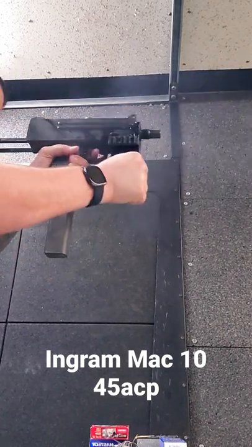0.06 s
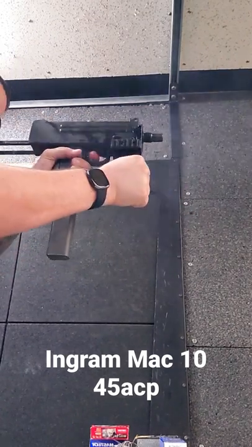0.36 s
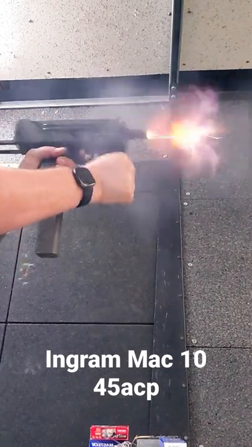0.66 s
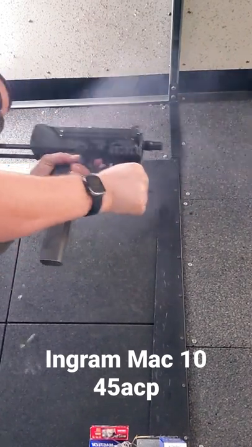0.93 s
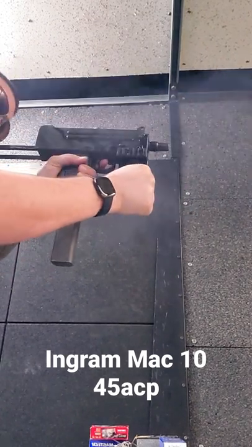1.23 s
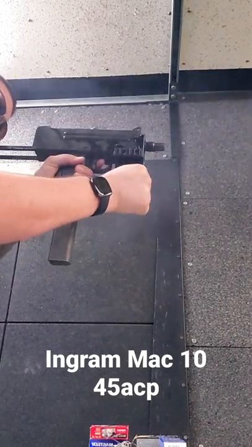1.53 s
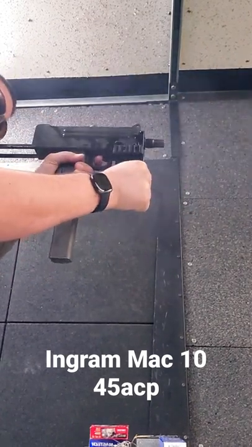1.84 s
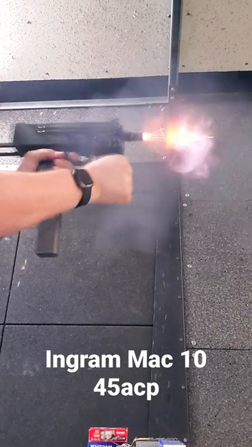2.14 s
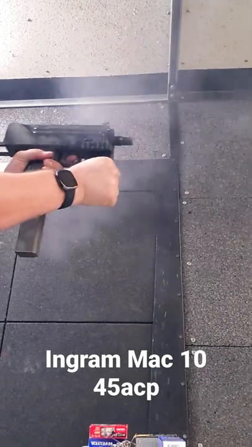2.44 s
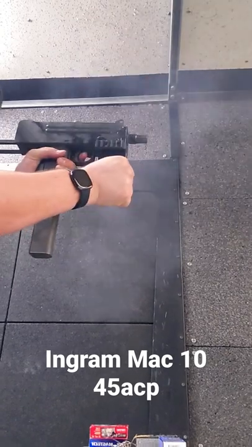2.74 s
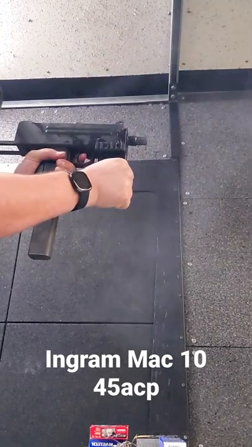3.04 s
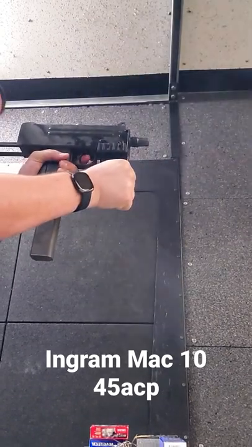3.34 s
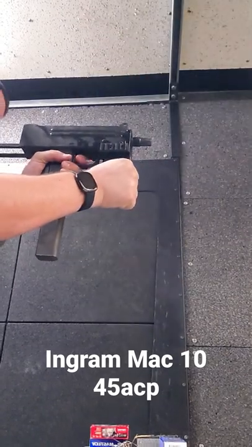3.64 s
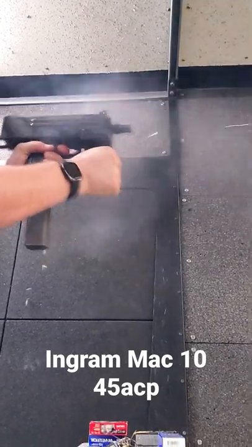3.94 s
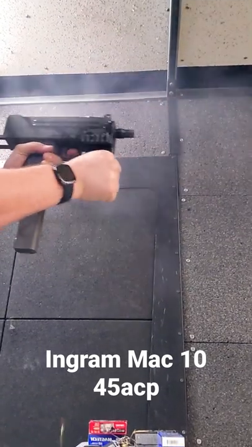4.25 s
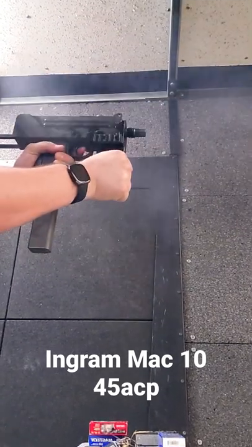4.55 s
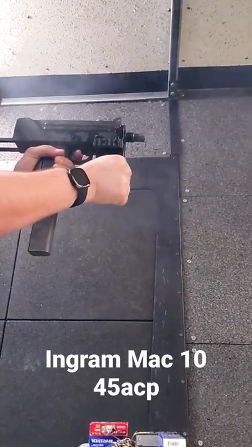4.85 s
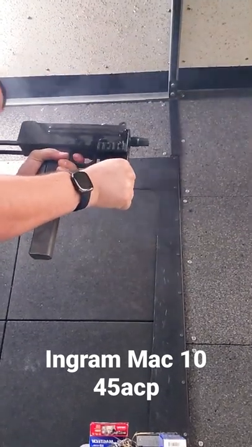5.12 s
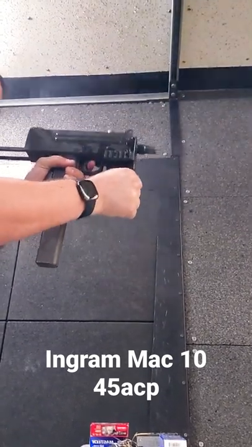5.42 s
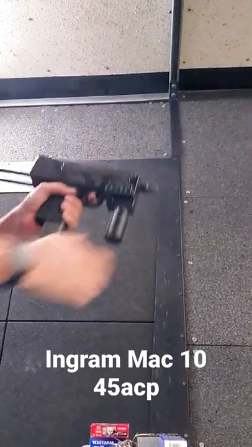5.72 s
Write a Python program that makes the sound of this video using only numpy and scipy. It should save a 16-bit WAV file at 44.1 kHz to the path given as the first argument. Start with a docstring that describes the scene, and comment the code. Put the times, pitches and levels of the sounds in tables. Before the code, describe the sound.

Three rapid bursts of submachine gun fire ring through an indoor shooting range, each followed by a brief echo and clinking spent cases.

```python
"""A submachine gun fires three full-auto bursts from a booth of an indoor range, while an earlier burst
dies away. Each shot rings the booth and the hall, and its bullet slaps the trap at the far end.
The bolt clacks forward before each burst and empty brass cases tinkle and roll on the floor.
The ventilation rumbles throughout, and a sleeve rustles at the end.
The blasts overload the microphone, and its limiter turns everything down for a moment."""
import sys
import numpy as np
from scipy import signal
from scipy.fft import rfft, irfft, next_fast_len
from scipy.io import wavfile

SR = 44100
rng = np.random.default_rng(int(sys.argv[2]) if len(sys.argv) > 2 else 0)


def wav_out(sig):
    """Save sig, one row per channel (or a flat mono array), as 16-bit PCM at SR to the path in sys.argv[1]."""
    wavfile.write(sys.argv[1], SR, np.round(np.clip(np.atleast_2d(sig).T, -1, 1) * 32767).astype(np.int16))


N = 259308
LEAD = SR  # one extra second before time zero holds the earlier burst
TIME = np.arange(-LEAD, N) / SR

# the tones of a ringing brass case; t60 is the time a sound takes to fade by 60 dB
# (frequency [Hz], relative level [dB], t60 [s])
BRASS_TONES = [(7130, -3.5, 0.36), (7300, -12, .26), (11740, -17, .33), (11560, -20.5, .28)]
# the tone colour of struck steel: (frequency [Hz], relative level [dB])
STEEL_COLOUR = [(200, 16), (1000, -2), (3300, 5.5), (5200, -5.5), (6800, 0.5), (9000, -2), (13000, -11),
                (16000, -11.5)]
# the pitches at which a blast makes the booth ring: (frequency [Hz], width [Hz], boost [dB])
BOOTH_RESONANCES = [(148, 42, 5), (195, 24, 3), (231, 15, 8.5), (286.8, 55, 10.5), (341, 9.9, 10),
                    (445.6, 63, 8.5), (630, 130, 6.5), (912, 10, 7)]
# the bursts of fire, with relative levels; the sear is the catch that holds the bolt back
# (first shot [s], last shot [s], rounds [count], first blast [dB], bolt travel [s], sear click [dB],
#  chambering clack [dB])
BURSTS = [(-.38, -.28, 3, 9, .04, -25, -15), (0.4845, .714, 6, 6.5, 0.038, -24.5, -22),
          (1.997, 2.346, 8, 8, .061, -33, -15), (3.7314, 4.122, 9, 7, 0.043, -24.5, -12.5)]


def from_db(db):
    """Turn decibels into a factor to multiply by."""
    return 10 ** (np.asarray(db) / 20)


def at_hz(points, hz):
    """Read between the rows of a (frequency, value) table, giving each octave equal room."""
    table_hz, values = np.transpose(points)
    return np.interp(np.log(np.maximum(hz, 1)), np.log(table_hz), values)


def fade(t, t60):
    """Start at t = 0 and die away by 60 dB every t60 seconds."""
    return (t >= 0) * np.exp(-np.log(1000) * np.maximum(t, 0) / t60)


def add(track, time_s, sound):
    """Mix a stereo sound into the track at the given time."""
    start = LEAD + round(time_s * SR)
    part = sound[:, :max(track.shape[1] - start, 0)]
    track[:, start:start + part.shape[1]] += part


def low_cut(x, hz):
    """Gently remove the sound below a frequency."""
    return signal.sosfilt(signal.butter(2, hz, "high", fs=SR, output="sos"), x)


def noise(colour, size, resonances=()):
    """Stereo noise of strength 1 with a given tone colour and, if wanted, some boosted pitches."""
    # how much the microphone's two openings differ: (frequency [Hz], side minus mid [dB])
    stereo_width = [(60, -27), (380, -25.5), (700, -6), (1200, 2), (2400, 0.5), (16000, 0)]
    hz = np.fft.rfftfreq(size, 1 / SR)
    boost_db = sum(db / (1 + (2 * (hz - centre) / width) ** 2) for centre, width, db in resonances)
    # mid is what left and right share, side is where they differ
    mid, side = np.exp(2j * np.pi * rng.random((2, len(hz))))
    spread = from_db(at_hz(stereo_width, hz))
    left_right = (mid + spread * side * [[1], [-1]]) / np.hypot(1, spread)
    x = irfft(left_right * from_db(at_hz(colour, hz) + boost_db), size)
    return x / x.std()


def hit(colour, t60, room_db, room_t60):
    """A short impact and the longer wash it leaves in the room."""
    t = np.arange(SR // 2) / SR
    return noise(colour, len(t)) * np.hypot(fade(t, t60), from_db(room_db) * fade(t, room_t60))


def ventilation(level_db=-52.5):
    """Air rumbles steadily through humming ducts."""
    # the tone colour of the moving air: (frequency [Hz], relative level [dB])
    air_colour = [(20, -14.5), (45, -0.5), (130, -1.5), (220, -13), (400, -9.5), (800, -20), (1600, -16.5),
                  (4400, -22.5), (6000, -29), (9000, -42), (16000, -42)]
    # the hum of the ducts: (frequency [Hz], width [Hz], boost [dB])
    duct_hum = [(72, 12, 4), (142.8, 22, 10)]
    return from_db(level_db) * noise(air_colour, next_fast_len(len(TIME)), duct_hum)[:, :len(TIME)]


def sleeve(peak_s=5.88, peak_db=-44.5, rise_db_per_s=45):
    """A sleeve's soft rustle grows as the gun is lowered."""
    # the tone colour of rubbing cloth: (frequency [Hz], relative level [dB])
    cloth_colour = [(40, -7), (110, 7.5), (450, -2.5), (800, -12), (1600, -4), (2400, -8), (4500, -11),
                    (8000, -31.5), (16000, -26)]
    swell = from_db(peak_db - rise_db_per_s * np.abs(TIME - peak_s))
    return swell * noise(cloth_colour, next_fast_len(len(TIME)))[:, :len(TIME)]


def rolling_cases(level_db=-3, tone_width_hz=25, half_strength_s=.07):
    """Scraping over the floor keeps a rolling case singing; each roll swells and fades."""
    # cases rolling past: (loudest moment [s], relative level [dB])
    rolls = [(1.5, -53), (1.89, -56), (3.39, -56.5), (4.75, -52.5), (5.32, -52.5), (5.68, -55.5),
             (5.86, -46.5)]
    scrape = rng.standard_normal((2, len(TIME)))
    song = sum(from_db(db) * signal.lfilter(*signal.iirpeak(hz, hz / tone_width_hz, fs=SR), scrape)
               for hz, db, _ in BRASS_TONES)
    swells = sum(from_db(db) / (1 + ((TIME - time_s) / half_strength_s) ** 2) for time_s, db in rolls)
    return from_db(level_db) * swells * song / song.std()


def landings(hop_s=.055, contact_loss_db=12, ring_loss_db=7, strays_per_s=4, stray_spread_db=3.5):
    """Near cases land and hop once, more softly; stray ones land at random further off."""
    # the nearest cases landing, with relative levels: (time [s], tick [dB], clink [dB], ring [dB])
    near_cases = [(.211, -39.5, -60, -39), (.3013, -46, -48, -44.5), (.356, -34.5, -49, -63),
                  (1.1573, -37.5, -41, -49), (1.364, -41, -47, -41), (1.4772, -42, -47, -39.5),
                  (1.719, -29.5, -43, -55), (1.821, -46, -49, -42.5), (2.7167, -41, -33.5, -40),
                  (2.846, -36, -39, -48), (2.8881, -34, -38, -45), (2.935, -38, -51, -57),
                  (3.079, -38, -39, -64), (3.165, -42.5, -55, -64), (3.31, -58, -44.5, -51),
                  (3.3426, -46, -60, -44), (3.5388, -47, -45.5, -50), (4.4714, -34.5, -43, -60),
                  (4.5736, -36.5, -38.5, -52), (4.7312, -36, -44, -48), (4.8458, -39, -62, -46),
                  (4.9798, -42.5, -47.5, -54), (5.105, -42, -46.5, -61), (5.225, -48, -54, -47),
                  (5.322, -36.5, -46, -50), (5.39, -47, -52, -52), (5.5503, -44, -54, -58),
                  (5.638, -49, -45, -44)]
    rows = list(near_cases)
    for time_s, tick_db, clink_db, ring_db in near_cases:
        hop_time_s = time_s + hop_s * rng.uniform(.5, 1.5)
        rows.append((hop_time_s, tick_db - contact_loss_db, clink_db - contact_loss_db,
                     ring_db - ring_loss_db))
    stray_db = np.array([-51, -57.5, -53.5])  # tick, clink, ring
    for slot_s in np.arange(0, N / SR, 1 / strays_per_s):
        time_s = slot_s + rng.random() / strays_per_s
        rows.append((time_s, *(stray_db + stray_spread_db * rng.standard_normal(3))))
    return rows


def floor_contact(t, bounce_s=.0083, bounce_db=-5, room_db=-12):
    """How a landing's loudness moves: one end of the case touches, then the other; the room answers."""
    first_end = fade(t, t60=.05) * (1 - np.exp(-t / .001))
    second_end = from_db(bounce_db) * fade(t - bounce_s * rng.uniform(.49, 2.2), t60=.064)
    room = from_db(room_db) * fade(t, t60=.21)
    return np.hypot(np.hypot(first_end, second_end), room)


def brass_ring(t, detune=.0049, flutter_hz=45, flutter_depth=.47, spread_db=1):
    """One case rings; its spin and the room's echoes make each of its tones flutter."""
    out = 0
    pitch = 1 + detune * rng.standard_normal()
    steps = np.arange(200)
    for hz, db, t60 in BRASS_TONES:
        strength = from_db(db + spread_db * rng.standard_normal((2, 1)))
        # complex random numbers shake both the loudness and the phase of the tone
        jolts = rng.standard_normal((2, len(steps))) + 1j * rng.standard_normal((2, len(steps)))
        wobble = np.array([np.interp(2 * flutter_hz * t, steps, channel) for channel in jolts])
        flutter = (1 + flutter_depth * wobble) / np.hypot(1, flutter_depth)
        tone = np.exp(2j * np.pi * (hz * pitch * t + rng.random((2, 1))))
        out = out + strength * fade(t, t60) * np.real(flutter * tone)
    return out


def falling_cases(tick_gain_db=-4):
    """Each case ticks, clinks and rings as it lands; there are also dull knocks against the booth."""
    # the tone colour of the sharp tick on the floor: (frequency [Hz], relative level [dB])
    tick_colour = [(300, -13), (1500, -10.5), (3000, -4), (6000, -3), (7100, 4), (9500, -4), (13000, -5),
                   (16000, -13.5)]
    # the tone colour of the metallic clink: (frequency [Hz], relative level [dB])
    clink_colour = [(500, -28.5), (2000, -27), (3100, -8), (3700, -7), (4300, -0.5), (4900, -11.5),
                    (16000, -38)]
    # cases striking the booth: (time [s], level [dB])
    booth_knocks = [(.307, -35.5), (.351, -37), (1.7192, -41.5), (2.748, -31.5), (2.932, -34), (3.397, -49),
                    (4.7338, -40.5), (5.242, -44), (5.322, -48)]
    # the tone colour of those knocks: (frequency [Hz], relative level [dB])
    knock_colour = [(100, -49), (400, -3), (650, -5), (950, -7), (1400, -9.5), (3000, -6.5), (6000, -14),
                    (16000, -30)]
    out = np.zeros((2, len(TIME)))
    t = np.arange(SR // 3) / SR
    for time_s, tick_db, clink_db, ring_db in landings():
        tick = from_db(tick_db + tick_gain_db) * noise(tick_colour, len(t))
        clink = from_db(clink_db) * noise(clink_colour, len(t))
        add(out, time_s, (tick + clink) * floor_contact(t) + from_db(ring_db) * brass_ring(t))
    for time_s, db in booth_knocks:
        add(out, time_s, from_db(db) * hit(knock_colour, t60=.15, room_db=-34, room_t60=.4))
    return out


def bolt(gain_db=2, pickup_after_s=.022, pickup_boost_db=7, chamber_before_s=.016):
    """Three steel clacks before a burst: the sear lets go, the bolt picks up a round and rams it home."""
    out = np.zeros((2, len(TIME)))
    for first_s, *_, travel_s, sear_db, chamber_db in BURSTS:
        release_s = first_s - travel_s
        clacks = [(release_s, sear_db, 2700),
                  (release_s + pickup_after_s, sear_db + pickup_boost_db, 1800),
                  (first_s - chamber_before_s, chamber_db, 1800)]
        for time_s, db, low_cut_hz in clacks:
            clack = hit(STEEL_COLOUR, t60=.076, room_db=-17, room_t60=.3)
            add(out, time_s, from_db(db + gain_db) * low_cut(clack, low_cut_hz))
    return out


def hall_echo(build_s=.09, far_wall_s=.247, swell_width_s=.034, swell_db=3):
    """The hall fills with sound, swells once as the far wall answers, and dies away treble first."""
    # the tone colour of the hall's echo: (frequency [Hz], relative level [dB])
    hall_colour = [(30, -33), (70, -2), (120, -9.5), (250, -4.5), (430, 2), (600, -10.5), (900, -9),
                   (1600, 0.5), (3000, -2.5), (5000, -10), (8000, -19), (16000, -66.5)]
    # how long the hall rings: (frequency [Hz], t60 [s])
    fade_times = [(60, 1.77), (150, 1.046), (400, 0.93), (800, 0.94), (2000, 0.84), (4000, 0.71),
                  (8000, 0.55), (16000, .3)]
    t = np.arange(2 * SR) / SR
    spectrum = rfft(noise(hall_colour, len(t), BOOTH_RESONANCES))
    hz = np.fft.rfftfreq(len(t), 1 / SR)
    centres, t60s = np.transpose(fade_times)
    out = 0
    for share, t60 in zip(np.eye(len(centres)), t60s):  # each band fades at its own speed
        band = irfft(spectrum * at_hz(np.c_[centres, share], hz), len(t))
        out = out + band * fade(t, t60)
    far_wall = 1 + from_db(swell_db) * np.exp(-((t - far_wall_s) / swell_width_s) ** 2)
    return out * (1 - np.exp(-t / build_s)) * far_wall


def booth_echo():
    """A blast bounces around the shooter so quickly that its echoes blur together."""
    # the tone colour of a blast in the booth: (frequency [Hz], relative level [dB])
    booth_colour = [(30, -47.5), (70, -23), (120, -2.5), (190, -2.5), (400, -10), (550, -4), (1100, -5.5),
                    (2500, -2), (4000, -10), (7000, -18.5), (10000, -26.5), (16000, -27)]
    t = np.arange(SR // 4) / SR
    return noise(booth_colour, len(t), BOOTH_RESONANCES) * fade(t, t60=.23)


def wall_slaps(phases, width_cycles=1.66, gain_db=-7.5, spread_db=3):
    """Large surfaces throw back short, low slaps, stronger or weaker as the muzzle jumps."""
    # echoes off the partitions, ceiling and back wall: (delay [s], pitch [Hz], relative level [dB])
    surfaces = [(0.0145, 672, 4.5), (0.0194, 400, 5.5), (0.025, 200.9, -3), (.031, 668, -3),
                (.041, 413, 0.5), (.046, 269, -4), (.058, 215, -6.5), (.066, 365, -4.5), (.088, 407, -4.5)]
    out = 0
    t = np.arange(SR // 8) / SR
    for (delay_s, hz, db), phase in zip(surfaces, phases):
        cycles = (t - delay_s) * hz
        strength = from_db(db + gain_db + spread_db * rng.standard_normal((2, 1)))
        out = out + strength * np.exp(-(cycles / width_cycles) ** 2) * np.sin(2 * np.pi * (cycles + phase))
    return out


def shots(sag_db=8.5, spread_db=1.55, jitter_s=.0012):
    """The gun fires almost evenly, weakening through a burst: rows of (time [s], relative level [dB])."""
    rows = []
    for first_s, last_s, rounds, first_db, *_ in BURSTS:
        for progress in np.linspace(0, 1, round(rounds)):
            later, louder = rng.standard_normal(2) * (progress > 0)  # the first shot does not vary
            time_s = first_s + progress * (last_s - first_s) + jitter_s * later
            rows.append((time_s, first_db - sag_db * progress + spread_db * louder))
    return rows


def gunfire(booth_db=7, hall_db=-12, crack_db=4, trap_db=-30, trap_delay_s=.186):
    """Each shot's hot gas cracks and rings the same room; then its bullet hits the steel trap."""
    # the tone colour of the gas leaving the muzzle: (frequency [Hz], relative level [dB])
    crack_colour = [(100, -16.5), (1000, -4), (3000, 19), (6000, 1.5), (9000, 5), (16000, -7.5)]
    out = np.zeros((2, len(TIME)))
    booth = from_db(booth_db) * booth_echo()
    hall = from_db(hall_db) * hall_echo()
    slap_phases = rng.random(9)  # one for each surface, the same for every shot
    t = np.arange(SR // 5) / SR
    for time_s, db in shots():
        crack = from_db(crack_db) * noise(crack_colour, len(t)) * fade(t, t60=.22)
        slaps = from_db(booth_db) * wall_slaps(slap_phases)
        for part in (booth, hall, crack, slaps):
            add(out, time_s, from_db(db) * part)
        bullet_hit = hit(STEEL_COLOUR, t60=.059, room_db=1.5, room_t60=.31)
        add(out, time_s + trap_delay_s, from_db(trap_db) * bullet_hit)
    return out


def scene():
    """Everything that reaches the microphone from time zero on."""
    return (gunfire() + bolt() + falling_cases() + rolling_cases() + ventilation() + sleeve())[:, LEAD:]


def smear(x):
    """The microphone's filters delay some pitches more than others, so flattened peaks turn spiky again."""
    for hz in (900, 3000, 8000):
        _, feedback = signal.iirpeak(hz, 1, fs=SR)
        x = signal.lfilter(feedback[::-1], feedback, x)  # all-pass: shifts timing, keeps tone colour
    return x


def microphone_openings(x, rumble_hz=38, lean_hz=480, lean=.086):
    """The left opening hears the low middle range a little more than the right; rumble is cut."""
    low_mids = signal.lfilter(*signal.iirpeak(lean_hz, .5, fs=SR), x)
    return low_cut(x + lean * low_mids * [[1], [-1]], rumble_hz)


def follow(x, lag_s):
    """Follow a changing value smoothly, a little behind it."""
    keep = np.exp(-1 / (lag_s * SR))
    return signal.lfilter([1 - keep], [1, -keep], x)


def limiter(x, threshold_db=-10.5, release_db_per_s=25, window_s=.0026, attack_s=.0017, ahead_s=.0016):
    """Turn the volume down quickly when the sound gets too loud, then let it creep back."""
    power = follow(np.mean(x ** 2, axis=0), window_s)
    over_db = np.maximum(10 * np.log10(power + 1e-12) - threshold_db, 0)
    ramp = release_db_per_s * np.arange(N) / SR
    held_db = np.maximum.accumulate(over_db + ramp) - ramp  # each peak sinks back at a steady rate
    ahead_db = np.interp(np.arange(N) + ahead_s * SR, np.arange(N), held_db)
    return x * from_db(-follow(ahead_db, attack_s))


def record(dry, overload_db=-6, top_cut_hz=15900):
    """The microphone flattens the blasts, colours and limits the sound, and cuts the highest treble."""
    # how strongly the microphone hears each pitch: (frequency [Hz], gain [dB])
    microphone_colour = [(20, -21), (40, 3), (60, -1), (400, -0.5), (1200, 2.5), (3000, -1), (6800, 2),
                         (8200, -4.5), (10000, -3.5), (12000, 4.5), (16000, 5)]
    ceiling = from_db(overload_db)
    flattened = ceiling * np.tanh(dry / ceiling)
    picked_up = microphone_openings(smear(flattened))
    hz = np.linspace(0, SR / 2, 1025)
    squared_gain = from_db(at_hz(microphone_colour, hz)) ** 2  # minimum_phase takes the square root
    tone_filter = signal.minimum_phase(signal.firwin2(1023, hz, squared_gain, fs=SR))
    coloured = signal.fftconvolve(picked_up, tone_filter[None], axes=1)[:, :N]
    top_cut = signal.ellip(12, .2, 70, top_cut_hz, fs=SR, output="sos")
    return signal.sosfilt(top_cut, limiter(coloured))


dry = scene()
out = record(dry)
wav_out(out)
```